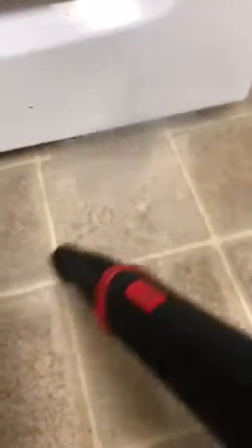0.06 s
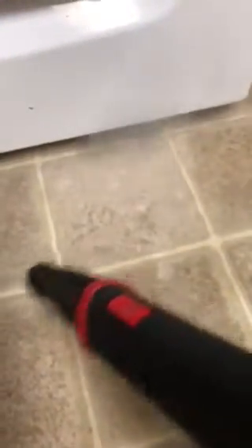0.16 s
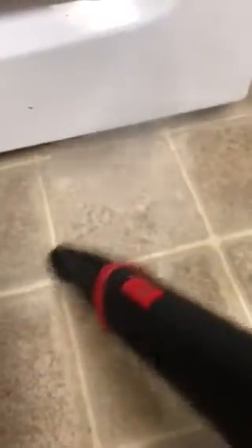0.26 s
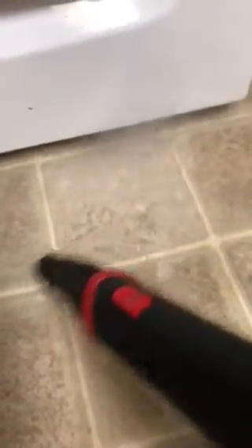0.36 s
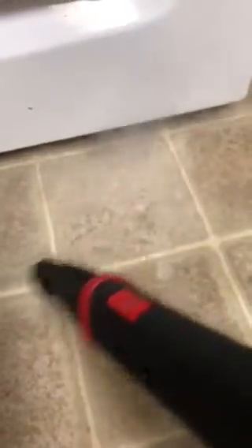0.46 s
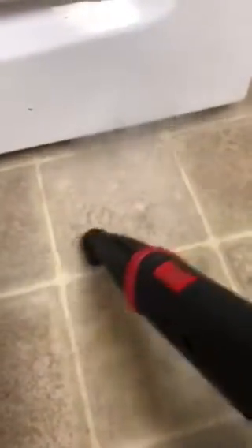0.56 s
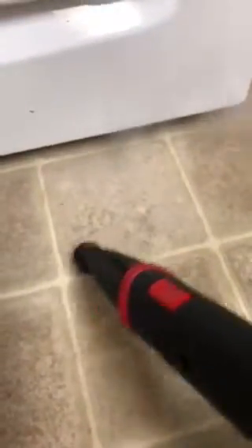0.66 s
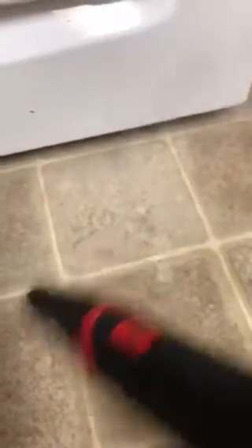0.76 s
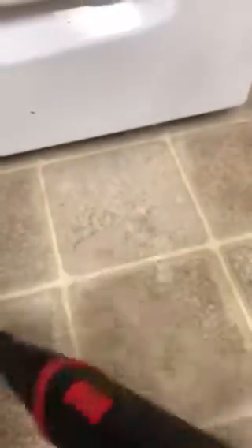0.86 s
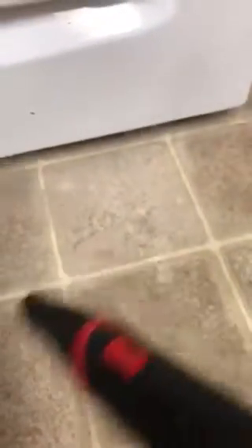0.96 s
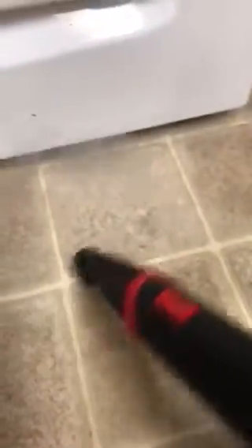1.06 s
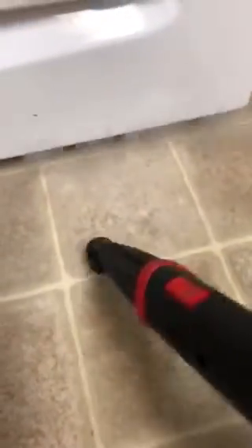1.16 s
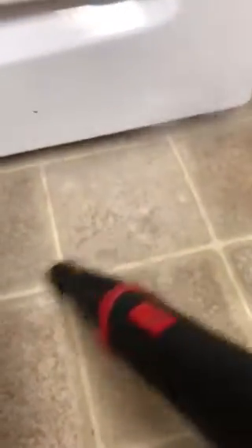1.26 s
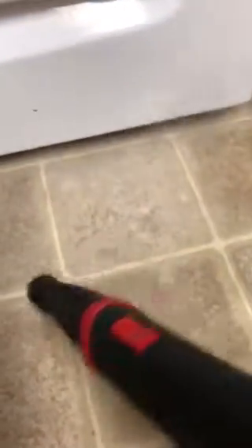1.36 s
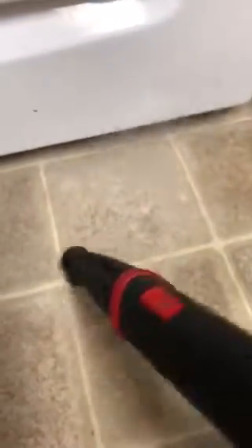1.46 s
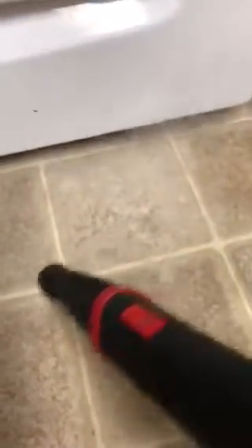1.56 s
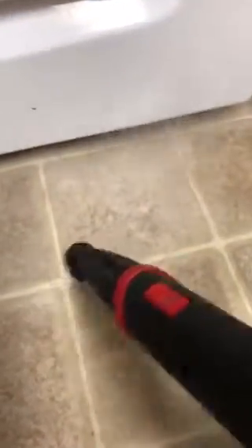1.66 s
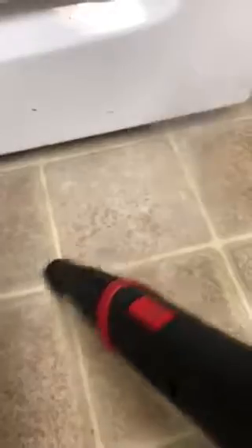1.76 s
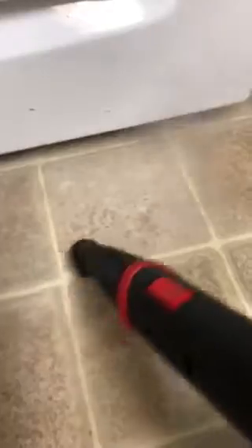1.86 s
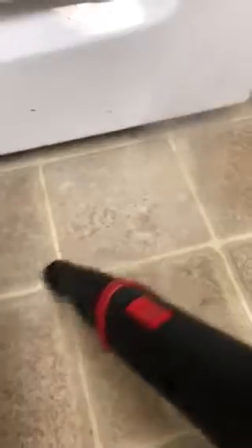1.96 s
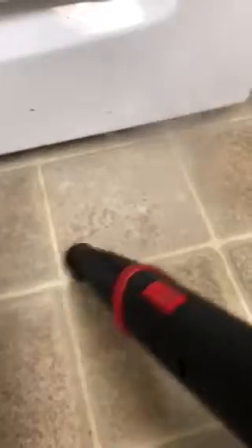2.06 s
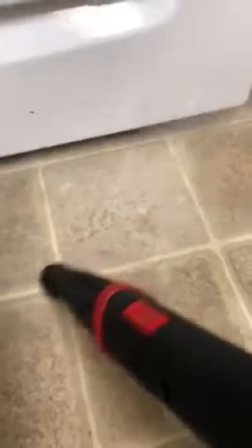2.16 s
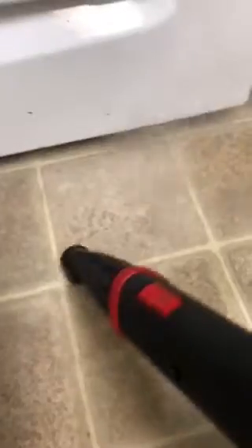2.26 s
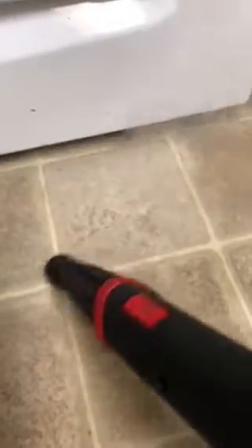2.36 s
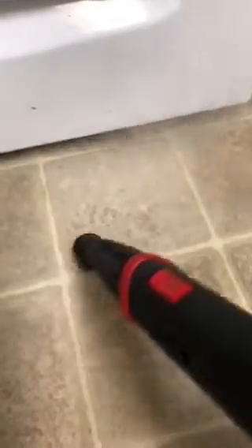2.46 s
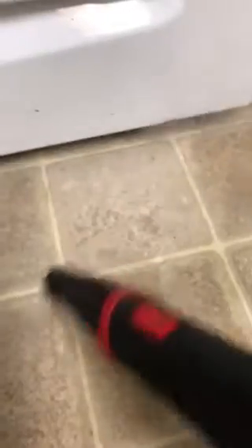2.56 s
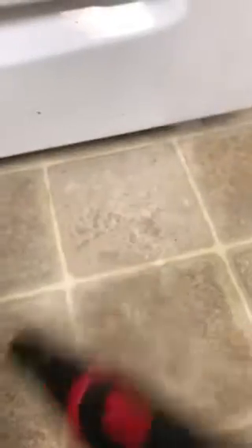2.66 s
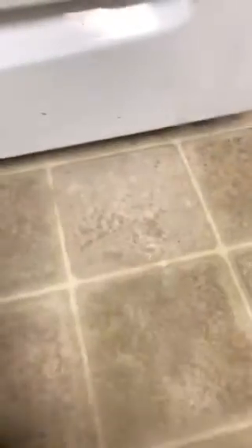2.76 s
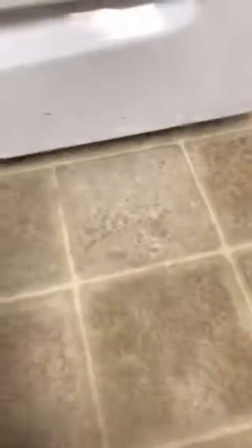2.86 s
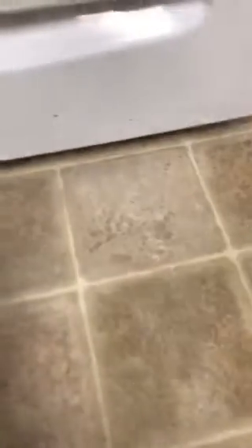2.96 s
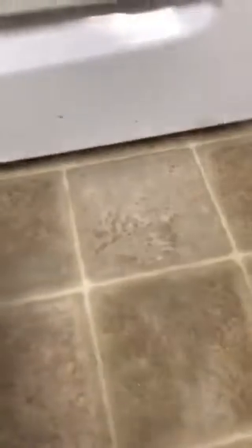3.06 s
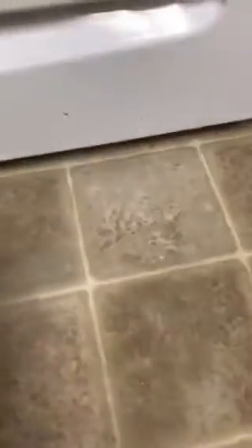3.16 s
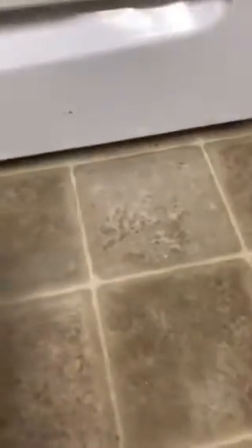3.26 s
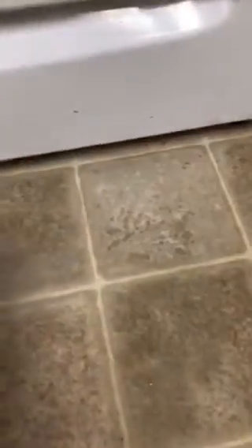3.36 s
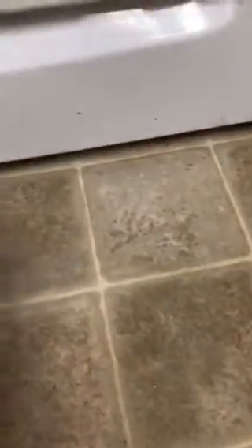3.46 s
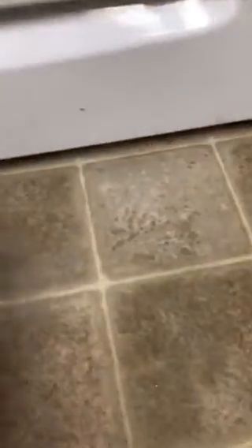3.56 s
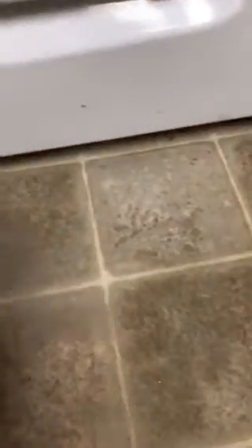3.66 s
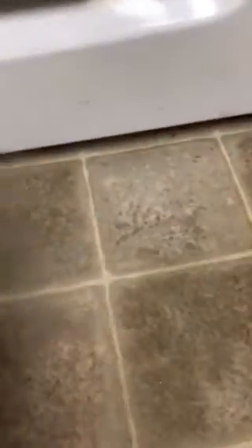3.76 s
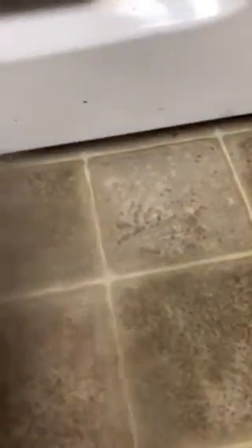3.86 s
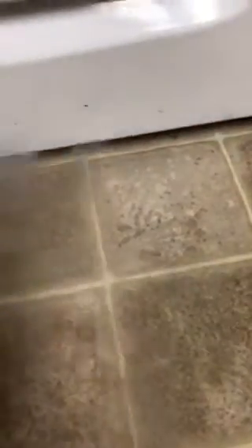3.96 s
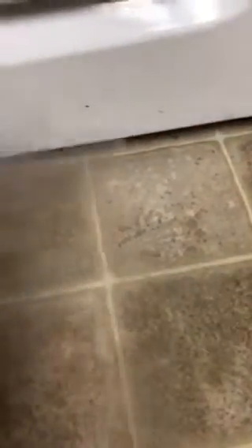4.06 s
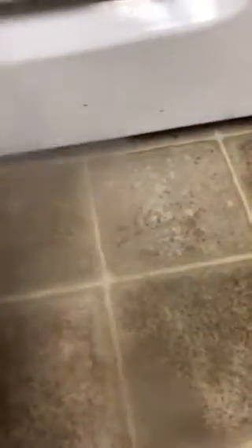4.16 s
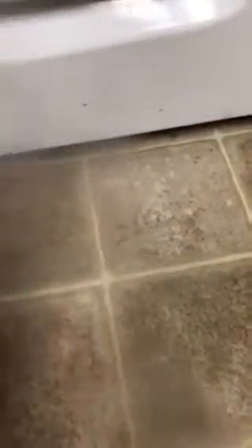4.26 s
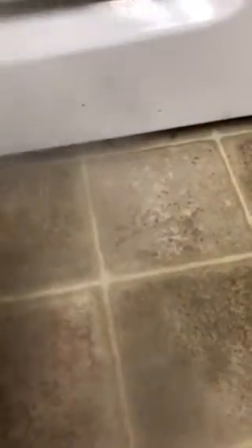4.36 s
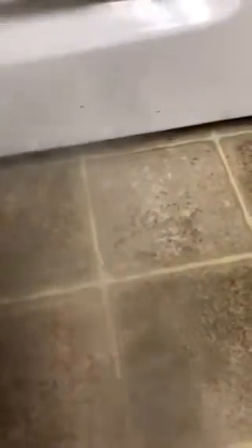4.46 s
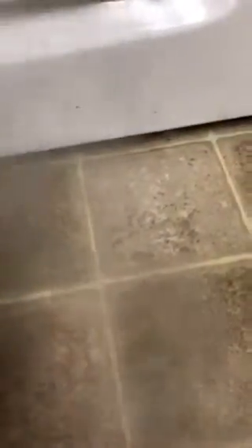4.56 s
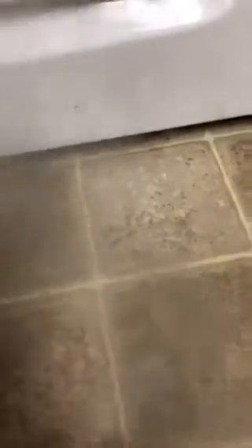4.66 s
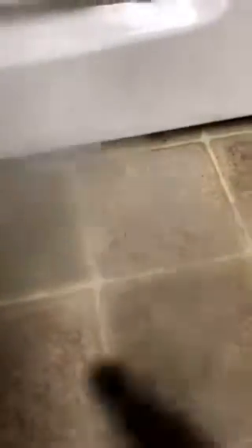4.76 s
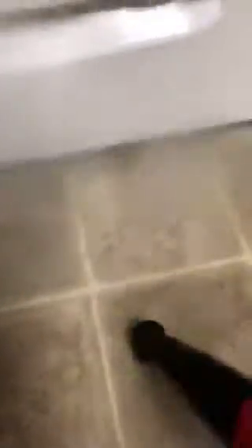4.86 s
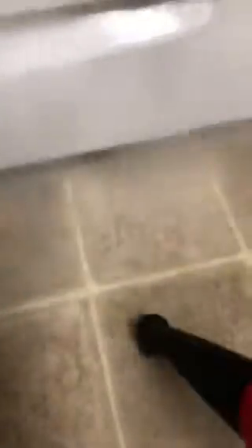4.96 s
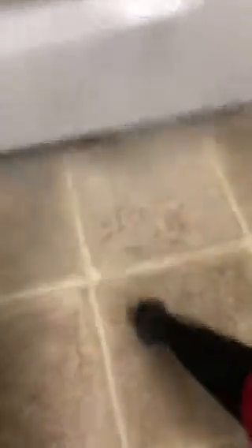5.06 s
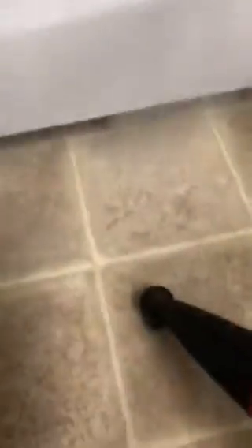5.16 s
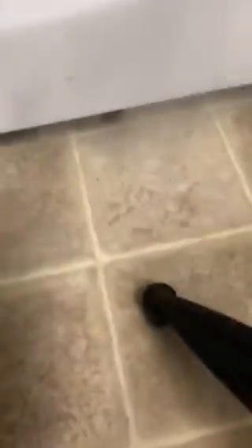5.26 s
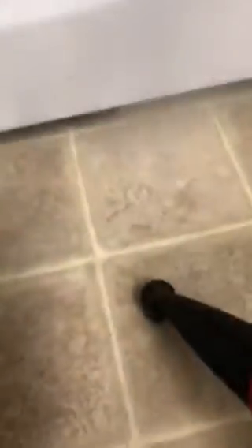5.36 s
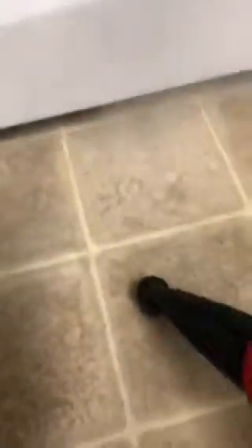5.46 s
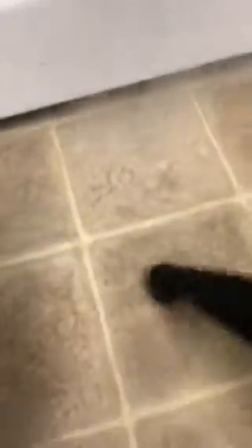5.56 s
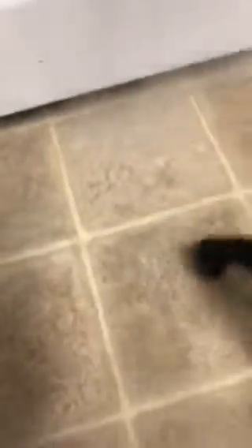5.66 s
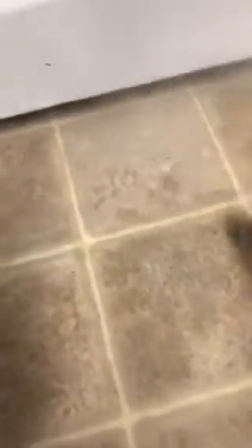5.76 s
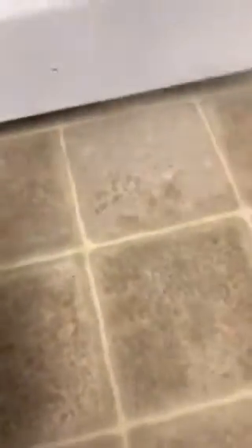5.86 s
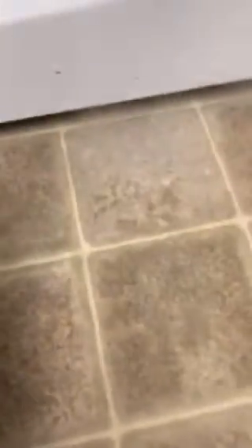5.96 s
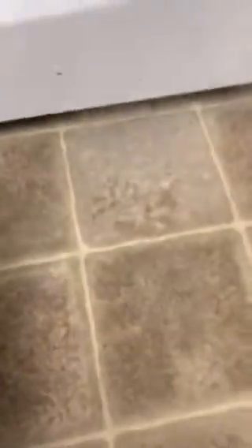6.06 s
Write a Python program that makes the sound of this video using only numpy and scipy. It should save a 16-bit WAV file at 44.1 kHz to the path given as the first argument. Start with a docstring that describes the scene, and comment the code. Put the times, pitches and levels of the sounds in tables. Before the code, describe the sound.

A handheld steam cleaner blasts a continuous bright hiss close to the microphone in a small tiled bathroom. Short dips mark scrubbing strokes; the jet briefly hits the floor harder and roars, then is drawn back into a thinner sizzle with hollow sweeping colour. It returns fuller, swishes aside and dies away rapidly, leaving faint room hum.

```python
"""A tiled floor beside a bathtub, where a handheld steam cleaner is scrubbed to and fro close to the listener.
Shaped turbulence noise and droplet bursts make the jet: it sizzles freely, and rushes, rings and roars on the tiles.
A delayed copy, the floor echo, combs the hiss and sweeps as the nozzle moves; the level dips with the strokes.
Slow gusts of low noise form the plume, a small room answers, and a faint hum lies beneath.
Near the end narrow bands of noise swish through the hiss, and the jet dies away."""
import sys
import numpy as np
from scipy import signal
from scipy.fft import rfft, irfft, next_fast_len
from scipy.io import wavfile
from scipy.ndimage import uniform_filter1d, map_coordinates

SR = 44100
rng = np.random.default_rng(int(sys.argv[2]) if len(sys.argv) > 2 else 0)


def unload_audio(sound):
    """Save the sound as a 16-bit wav file, at the path given as the first command line argument."""
    columns = np.transpose(np.atleast_2d(sound))
    # keep every value between -1 and 1, then stretch to whole-number steps
    steps = np.round(np.clip(columns, -1, 1) * 32767)
    wavfile.write(sys.argv[1], SR, steps.astype(np.int16))


N = 269653
TIME = np.arange(N) / SR

# All spectra below give relative level per Hz; the noise they colour is scaled to rms 1.
# Steady room air: f/Hz, level/dB
AIR_SPECTRUM = [(25, -24), (70, -29), (180, -10.5), (500, -10.5), (1300, -1.5), (3000, -9), (15000, -21)]
AIR_DB = -46
# Partials of the hum: f/Hz, level/dB (mean, each wavers slightly)
HUM_PARTIALS = [(178, -65), (301, -62), (360, -62), (539, -55.5), (1297, -87)]

# Spectrum of the free jet: f/Hz, level/dB
SIZZLE_SPECTRUM = [(40, -29), (500, -27), (2200, -28), (3300, -15), (4200, -13), (5200, 1), (6500, 3),
                   (9500, 0), (12000, 0), (13200, 1), (14000, 2.5), (15700, 2.5)]
# Spectrum of the rush on the tiles: f/Hz, level/dB
RUSH_SPECTRUM = [(40, -56), (800, -37.5), (2200, -18.5), (2500, -6.5), (3200, -6), (3900, -1), (6000, -1.5),
                 (7500, -5), (9000, -7.5), (15000, -8.5)]
# Spectrum of the low roar: f/Hz, level/dB
ROAR_SPECTRUM = [(40, -39), (200, -13), (500, -7), (850, -10), (1300, -4.5), (1600, -2), (2000, 1),
                 (2450, -2), (3000, 0.5), (4500, -6.5), (8000, -34), (15000, -38)]
# Resonances of the nozzle held near the tiles: f/Hz, width/Hz, relative level/dB
NOZZLE_MODES = [(4000, 110, -23), (4550, 160, 2), (5480, 890, 0), (14200, 1000, -23)]
# Top treble that the nozzle beams at the microphone: t/s, level/dB
BEAM_LEVEL = [(0, -0.5), (.7, 3), (.95, -5), (1.25, 2.5), (2.4, 2.5), (2.72, -2), (2.95, 6), (4.78, 6),
              (4.98, -2.5), (5.88, 2.5), (6.11, -14)]

# How each part follows the hand. Columns: level/dB near the floor, then changes of level/dB when
# raised, sweeping, drawn back, in the hard hit, swung away
# Sizzle of the free jet (columns as above)
SIZZLE_LEVELS = (-14.5, -0.4, -0.4, -7.5, -6.5, -1)
# Rush on the tiles (columns as above)
RUSH_LEVELS = (-20, 0.5, 1, -0.1, 3.5, -15.5)
# Low roar (columns as above)
ROAR_LEVELS = (-35.5, 0.5, -3.5, -2, 7, -10)
# Nozzle ring, relative to the rush (columns as above)
RING_LEVELS = (-5.5, 1.5, -4, -35, -0.5, -9)
# Gap resonance, relative to the roar (columns as above)
GAP_LEVELS = (-6, -10.5, 10, -3, 4, 1)
# Floor echo, relative to the filtered steam sound (columns as above)
BOUNCE_LEVELS = (-7.5, 1, 2.1, -5.5, -2.5, -10)

# Nozzle height before bobbing, as the lag of the floor echo behind the direct hiss: t/s, lag/ms
HEIGHT_LAG = [(0, .49), (.74, .45), (.98, .745), (1.19, .46), (1.45, .51), (2.58, .47), (2.71, .58),
              (2.87, .97), (3.27, 1.13), (4.6, 1.09), (4.69, 1.17), (4.95, .71), (5.44, .72), (5.71, .82),
              (5.98, .613), (6.11, .665)]
# Turns of the scrubbing hand, where the hiss dips: t/s, length/s, depth/dB
STROKE_DIPS = [(0.014, 0.011, 4.5), (0.241, 0.017, 6.5), (0.454, 0.025, 7), (0.79, 0.087, 2.5),
               (1.209, 0.0085, 3.5), (1.375, 0.1, 2), (1.62, 0.051, 2.5), (1.816, 0.043, 2),
               (1.997, 0.035, 2), (2.2, 0.038, 2.5), (2.432, 0.048, 4), (2.634, 0.071, 3),
               (3.477, 0.11, 3.5), (3.595, 0.012, 3.5), (3.73, 0.09, 8), (3.946, 0.076, 8),
               (4.046, 0.074, 1.5), (4.16, 0.071, 6.5), (4.254, 0.071, 2.5), (4.347, 0.07, 6.5),
               (4.427, 0.017, 3.5), (4.551, 0.07, 7.5), (4.664, 0.098, 1.5)]
# Hard surfaces close by, the wand and the tub: lag/ms, level/dB
NEAR_SURFACES = [(.21, -24), (.85, -20), (1.35, -24)]
# Spectrum of the plume: f/Hz, level/dB
PLUME_SPECTRUM = [(20, -30), (40, -10), (65, -2), (130, -2), (250, -4), (450, -8), (800, -10), (2000, -20)]
# Stronger puffs of the plume: t/s (centre), length/s, rise/dB
PLUME_PUFFS = [(0.616, 1, 2.5), (2.558, 0.22, 2.5), (5.77, 0.19, 13.5)]
# Gliding swishes as the nozzle is swung away, one list each: t/s, f/Hz, level/dB
SWISH_TRACKS = [
    [(4.7, 13800, -45), (4.85, 13200, -30), (5.3, 12900, -28), (5.68, 12300, -26), (5.73, 9000, -22),
     (5.76, 7500, -24), (5.8, 7000, -45)],
    [(5.74, 15400, -45), (5.77, 13500, -22), (5.8, 10500, -22), (5.83, 8500, -21), (5.88, 11500, -25),
     (5.95, 12300, -42)],
]

# Just after each turn the nozzle bobs up by this share of its height
BOB_SHARE, BOB_AFTER_S, BOB_S = 0.16, 0.051, 0.041
# Beyond this lag the gap under the nozzle is open
RAISED_MS, RAISED_BLEND_MS = 0.65, 0.059
# A narrow gap cuts off the rush below the edge by this share
EDGE_HZ, EDGE_SHARE = 2500, 0.79
FAST_MS_PER_S = 2.4  # rate of change of the echo lag in a quick sweep
# The jet hits the floor hard, once
HIT_S, HIT_RISE_S, HIT_HOLD_S, HIT_DECAY_S = 1.29, 0.061, 0.37, 0.31
# The nozzle is drawn well back, then returns
BACK_S, BACK_TAKES_S, RETURN_S, RETURN_TAKES_S = 2.75, 0.17, 4.68, 0.19
AWAY_S, AWAY_TAKES_S = 5.668, 0.19  # the nozzle is swung off the tiles
SHUT_S, SHUT_DB_PER_S = 5.914, 44  # the trigger is let go and the jet dies

ROOM_T60_S, ROOM_DB = 0.24, -9
PLUME_DB, PLUME_AWAY_DB = -40, -13.5  # the second is the change when the nozzle is swung away
# For a while the plume is calmer
LULL_S, LULL_ENDS_S, LULL_EDGE_S, LULL_DB = 0.89, 2.31, 0.1, -3.5
TOP_HZ = 15700  # upper edge of the microphone's band


def undb(db):
    """Logarithmic level: decibels become an amplitude ratio."""
    return 10 ** (np.asarray(db) / 20)


def unit(x):
    """Normalisation of power: the signal is scaled to rms 1."""
    return x / np.sqrt(np.mean(x ** 2))


def curves(table):
    """Linear interpolation: each column of a table is joined by straight lines in time."""
    t, *columns = np.transpose(table)
    return [np.interp(TIME, t, column) for column in columns]


def ramp(start_s, length_s):
    """Linear transition: 0 before the start, rising straight to 1."""
    return np.clip((TIME - start_s) / length_s, 0, 1)


def bump(centre_s, length_s):
    """Gaussian envelope: a smooth swell of height 1 around a moment."""
    return np.exp(-(2 * (TIME - centre_s) / length_s) ** 2)


def filtered(x, response):
    """Linear filtering: the spectrum is multiplied by a function of frequency."""
    size = next_fast_len(len(x) + 4096)
    f = np.arange(size // 2 + 1) * SR / size + 1e-3  # the offset avoids division by zero
    return irfft(rfft(x, size) * response(f), size)[:len(x)]


def colour(x, spectrum):
    """Spectral shaping: levels are interpolated over log frequency, and the result has rms 1."""
    hz, db = np.transpose(spectrum)
    return unit(filtered(x, lambda f: undb(np.interp(np.log(f), np.log(hz), db))))


def delayed(x, ms):
    """Propagation delay: a fixed or moving lag, whose motion shifts the pitch."""
    return map_coordinates(x, [np.arange(N) - ms * SR / 1000], order=3)


def walk(rate):
    """Slow random modulation: levels held 1 / rate s and smoothed twice, with spread near 1."""
    hold = max(int(SR / rate), 1)
    steps = np.repeat(rng.standard_normal(N // hold + 1), hold)
    smooth = uniform_filter1d(uniform_filter1d(steps, hold), hold)
    return unit(smooth)[:N]


def flutter(slow_hz=16, fast_hz=70):
    """Unsteady flow: band-limited random modulation without slow drift, of spread 1."""
    def band(f):
        return 1 / np.sqrt((1 + (slow_hz / f) ** 8) * (1 + (f / fast_hz) ** 3))
    return unit(filtered(rng.standard_normal(N), band))


def background(waver_db=-0.5, drift_rad=0.27):
    """Stationary ambience: broadband room air plus sines that waver in level and phase."""
    hum = 0
    for hz, db in HUM_PARTIALS:
        gain = undb(db + waver_db * walk(18.0)) * np.sqrt(2)  # sqrt(2) turns rms into peak
        hum = hum + gain * np.sin(2 * np.pi * hz * TIME + drift_rad * walk(10))
    return hum + undb(AIR_DB) * colour(rng.standard_normal(N), AIR_SPECTRUM)


def bounce_lag():
    """Path difference: nozzle height sets the lag of the floor echo in ms, bobbing with the strokes."""
    height_ms, = curves(HEIGHT_LAG)
    bobs = np.max([bump(t + BOB_AFTER_S, 2 * BOB_S) for t, _, _ in STROKE_DIPS], axis=0)
    return height_ms * (1 + BOB_SHARE * bobs)


def raised():
    """Smooth threshold: near 0 while the nozzle skims the tiles, near 1 once the gap is open."""
    return (1 + np.tanh((bounce_lag() - RAISED_MS) / (2 * RAISED_BLEND_MS))) / 2


def hand_moves():
    """Kinematics of the nozzle: 0-1 controls raised, sweeping, drawn back, hard hit, swung away."""
    height_ms, = curves(HEIGHT_LAG)
    speed = uniform_filter1d(np.abs(np.gradient(height_ms, TIME)), size=SR // 20)
    sweeping = np.minimum(speed / FAST_MS_PER_S, 1)
    back = ramp(BACK_S, BACK_TAKES_S) - ramp(RETURN_S, RETURN_TAKES_S)
    after_hold_s = np.maximum(TIME - HIT_S - HIT_RISE_S - HIT_HOLD_S, 0)
    hit = ramp(HIT_S, HIT_RISE_S) * np.exp(-after_hold_s / HIT_DECAY_S)
    return raised(), sweeping, back, hit, ramp(AWAY_S, AWAY_TAKES_S)


def follow(levels, hand):
    """Superposition of level changes: each move of the hand adds its share in dB."""
    near_db, *changes_db = levels
    return near_db + sum(db * move for db, move in zip(changes_db, hand))


def dips():
    """Amplitude modulation by the strokes: flat-bottomed hollows, as positive dB of depth."""
    total_db = 0
    for t, length, depth in STROKE_DIPS:
        distance = np.minimum(np.abs(2 * (TIME - t) / length), 3)
        total_db = total_db + depth * np.exp(-distance ** 4)
    return total_db


def turbulence(drops_per_s=2500, spread_db=3, drops_db=-8):
    """Turbulent mixing noise: a Gaussian rush peppered with impulses of bursting condensed droplets."""
    hits = rng.random(N) < drops_per_s / SR
    strength_db = spread_db * np.minimum(rng.exponential(size=N), 4)
    drops = hits * rng.choice([-1, 1], N) * undb(strength_db)
    return unit(rng.standard_normal(N) + undb(drops_db) * unit(drops))


def free_jet(beam_db, beam_hz=12500):
    """Directivity of a free jet: the shortest waves leave in a narrow beam, so the top treble varies."""
    sizzle = colour(turbulence(), SIZZLE_SPECTRUM)
    treble = filtered(sizzle, lambda f: 1 / (1 + (beam_hz / f) ** 12))
    return sizzle + (undb(beam_db) - 1) * treble


def nozzle_ring():
    """Resonance: turbulence excites a sum of damped modes of the nozzle near the tiles."""
    def modes(f):
        return sum(undb(db) / (1 + 1j * (f * f - hz * hz) / (f * width)) for hz, width, db in NOZZLE_MODES)
    return unit(filtered(turbulence(), modes))


def rush_on_tiles(ring_db, raised_share):
    """Impinging jet: broadband rush and ring, losing their lower part when the gap is narrow."""
    rush = colour(turbulence(), RUSH_SPECTRUM) + undb(ring_db) * nozzle_ring()
    rush = rush / np.sqrt(1 + undb(2 * ring_db))  # keeps the power steady
    below_edge = filtered(rush, lambda f: 1 / (1 + (f / EDGE_HZ) ** 24))
    return rush - EDGE_SHARE * (1 - raised_share) * below_edge


def gap_tone(hz=1640, width_hz=150):
    """Cavity resonance: noise excites the narrow gap between nozzle and floor into a hollow tone."""
    return unit(filtered(rng.standard_normal(N), lambda f: 1 / (1 + 1j * (f * f - hz * hz) / (f * width_hz))))


def jet(hand, beam_db, flutter_db=0.81, flicker_db=0.7, roar_dip=0.74):
    """Superposition of jet sources: sizzle, rush and roar share the flow's flutter and flicker singly."""
    sizzle = free_jet(beam_db)
    rush = rush_on_tiles(follow(RING_LEVELS, hand), hand[0])
    # the closer and harder the hit, the more the gap sings along
    roar = colour(turbulence(), ROAR_SPECTRUM) + undb(follow(GAP_LEVELS, hand)) * gap_tone()
    dip_db = dips()
    parts = [(sizzle, follow(SIZZLE_LEVELS, hand) - dip_db),
             (rush, follow(RUSH_LEVELS, hand) - dip_db),
             (roar, follow(ROAR_LEVELS, hand) - roar_dip * dip_db)]
    mixed = sum(part * undb(db + flicker_db * walk(50)) for part, db in parts)
    return undb(flutter_db * flutter()) * mixed


def reflections(x, lag_ms, bounce_db, count=2):
    """Comb filtering: delayed floor echoes interfere with the direct sound, beside fixed near echoes."""
    def bounce(f):
        # low tones come from all along the jet and blur out; the spray scatters the top treble
        return 1j * f / (1j * f + 1900) / np.sqrt(1 + (f / 9500) ** 6)

    def surfaces(f):
        return sum(undb(db) * np.exp(-2j * np.pi * f * ms / 1000) for ms, db in NEAR_SURFACES)

    out, echo = x, x
    for _ in range(count):
        echo = undb(bounce_db) * delayed(filtered(echo, bounce), lag_ms)
        out = out + echo
        echo = echo / 2  # the small nozzle sends only part of it back down
    return (out + filtered(x, surfaces)) / np.sqrt(1 + undb(2 * bounce_db) / 2)


def room(x, first_s=0.000853, early_s=0.0092, early_db=8):
    """Reverberation of a small tiled room: convolution with strong early noise and a short tail."""
    t = np.arange(SR // 2) / SR
    decay = undb(-60 * t / ROOM_T60_S) + undb(early_db) * np.exp(-t / early_s)
    response = rng.standard_normal(len(t)) * (t > first_s) * decay
    return signal.fftconvolve(x, response / np.linalg.norm(response))[:N]


def plume(gust_db=2, dip_share=0.55):
    """Low-frequency turbulence: the steam cloud buffets the air in gusts, puffs and one lull."""
    lull = ramp(LULL_S, LULL_EDGE_S) - ramp(LULL_ENDS_S, LULL_EDGE_S)
    puffs_db = sum(db * bump(t, length) for t, length, db in PLUME_PUFFS)
    level_db = PLUME_DB + LULL_DB * lull + puffs_db + PLUME_AWAY_DB * ramp(AWAY_S, AWAY_TAKES_S)
    gusts_db = gust_db * flutter(slow_hz=2.9, fast_hz=39.8)
    rumble = colour(rng.standard_normal(N), PLUME_SPECTRUM)
    return rumble * undb(level_db + gusts_db - dip_share * dips())


def swishes(width_hz=700):
    """Ring modulation: low-passed noise times a gliding sine gives narrow bands of moving centre."""
    out = 0
    for track in SWISH_TRACKS:
        hz, db = curves(track)
        noise = filtered(rng.standard_normal(N), lambda f: 1 / (1 + (f / width_hz) ** 2))
        carrier = np.sin(2 * np.pi * np.cumsum(hz) / SR)
        sounding = (TIME > track[0][0]) & (TIME < track[-1][0])
        out = out + sounding * undb(db) * unit(noise * carrier)
    return out


def scene():
    """Superposition at one point: steam, echoes, room, plume and ambience, alike in both channels."""
    beam_db, = curves(BEAM_LEVEL)
    lag_ms, hand = bounce_lag(), hand_moves()
    valve = undb(-SHUT_DB_PER_S * np.maximum(TIME - SHUT_S, 0))
    steam = valve * jet(hand, beam_db) + swishes()
    # the paths to the walls change as the nozzle moves, so the room's colour shifts with it
    walls = (room(steam) + room(delayed(steam, 2 * lag_ms))) / np.sqrt(2)
    near = reflections(steam, lag_ms, follow(BOUNCE_LEVELS, hand))
    mono = near + undb(ROOM_DB) * walls + plume() + background()
    return np.array([mono, mono])


def record(dry, low_hz=32):
    """Band limitation of the microphone: the deepest bass falls away and the top is cut steeply."""
    high_pass = signal.butter(2, low_hz, "high", fs=SR, output="sos")
    low_pass = signal.ellip(12, 0.1, 80, TOP_HZ, fs=SR, output="sos")
    return signal.sosfilt(low_pass, signal.sosfilt(high_pass, dry))


dry = scene()
out = record(dry)
unload_audio(out)
```